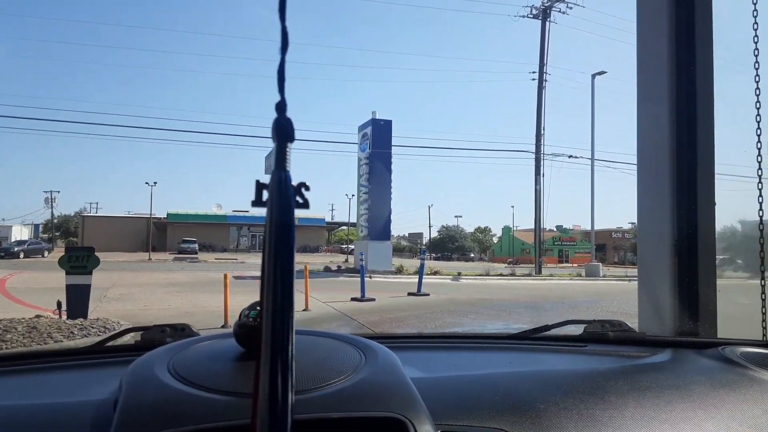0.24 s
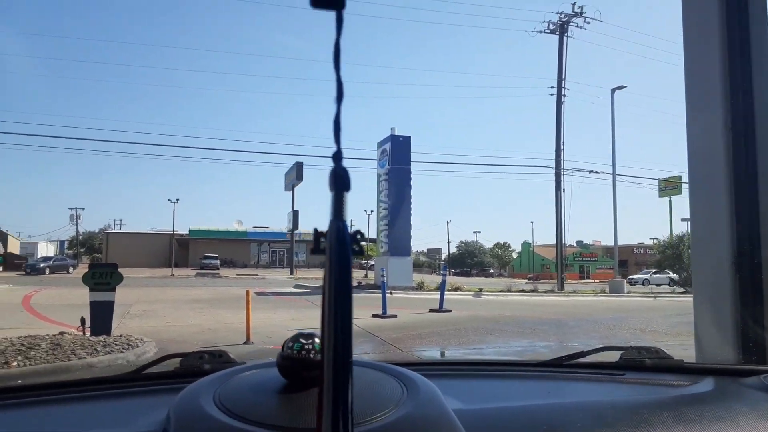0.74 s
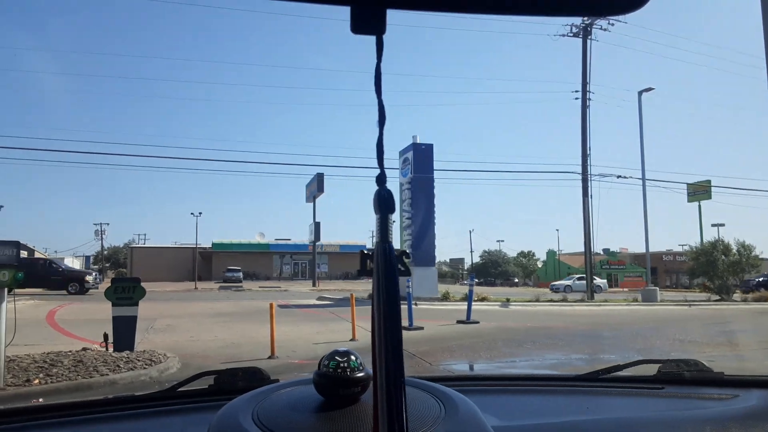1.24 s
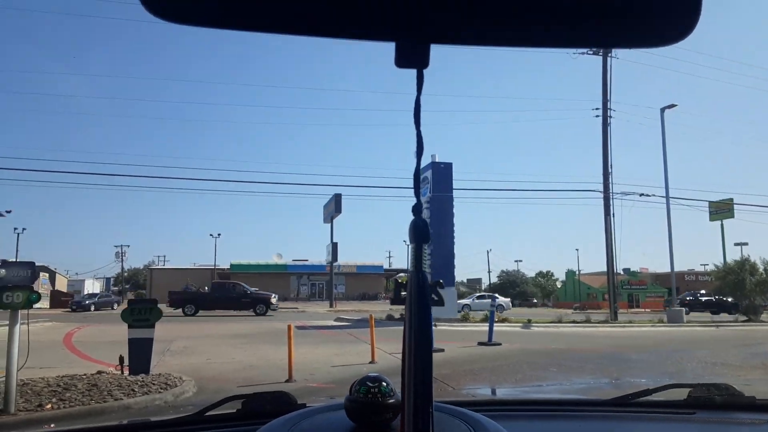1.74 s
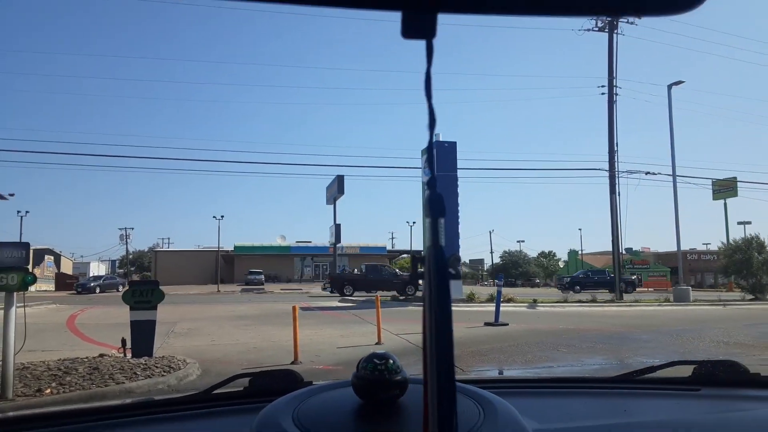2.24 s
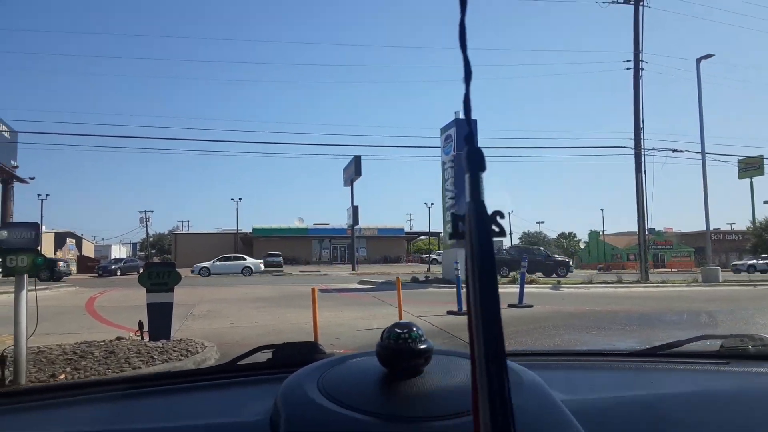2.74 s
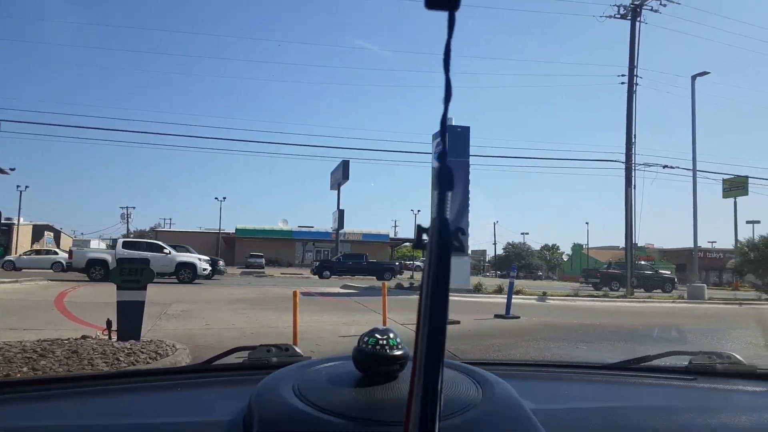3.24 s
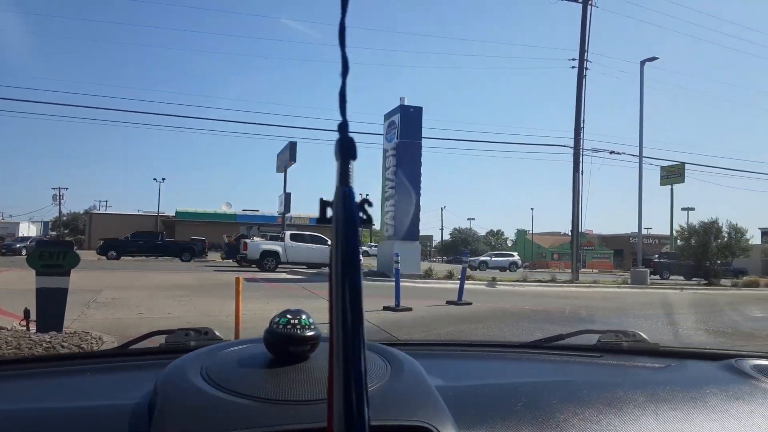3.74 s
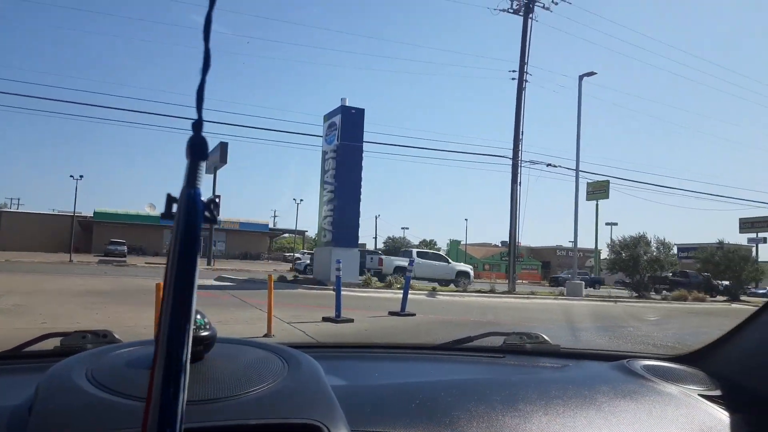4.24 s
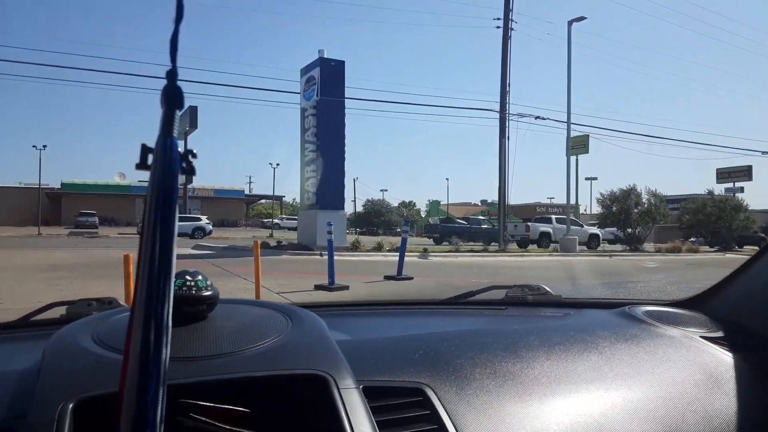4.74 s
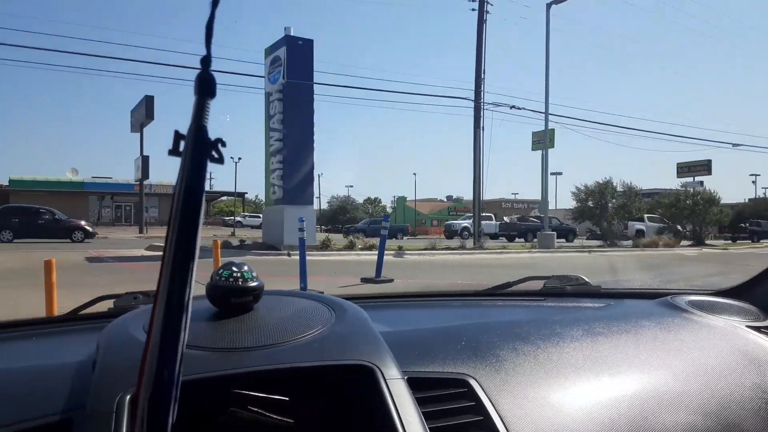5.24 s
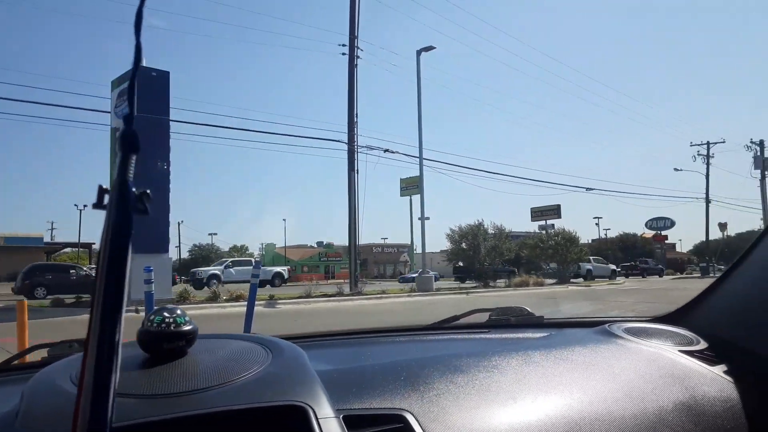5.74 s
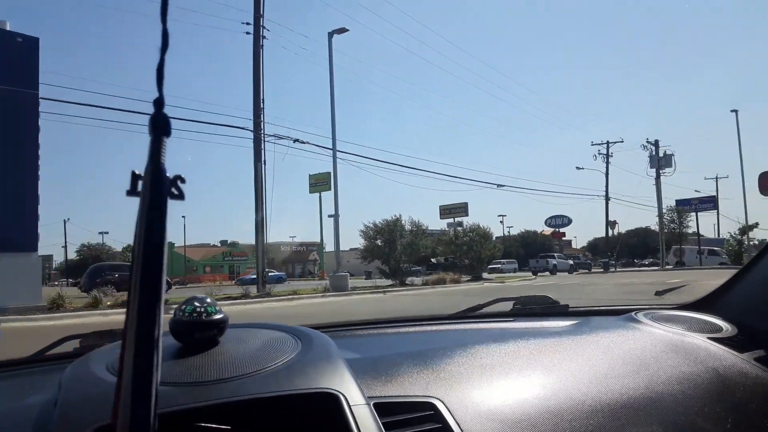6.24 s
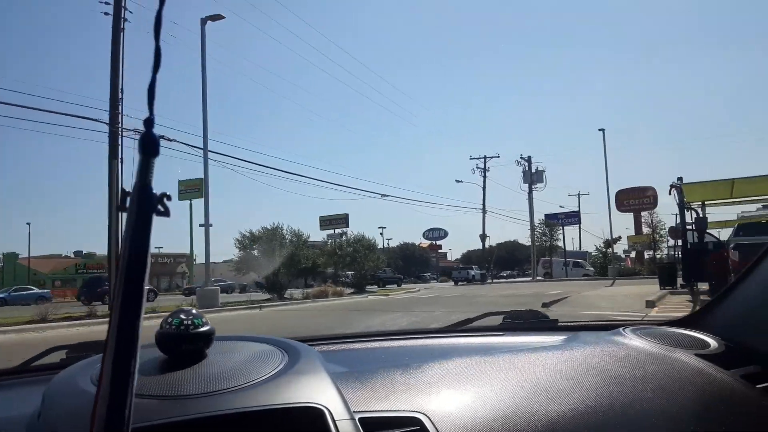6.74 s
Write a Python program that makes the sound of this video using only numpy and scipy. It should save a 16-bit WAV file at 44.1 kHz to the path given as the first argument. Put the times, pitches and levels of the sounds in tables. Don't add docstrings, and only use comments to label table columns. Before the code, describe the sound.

A phone inside a moving car picks up dense low blower rumble and boomy body vibration, steady for over two seconds. It then sinks quickly as the car rolls clear, uncovering a wavering fan hum, another fan coasting down in pitch, soft airy hiss and a low engine idle. Faint cloth rustle accompanies the turn; one sharper trim snap comes near the end, amid quiet rolling rumble.

```python
import sys
import numpy as np
from scipy import signal
from scipy.fft import rfft, irfft, next_fast_len
from scipy.io import wavfile
from scipy.ndimage import uniform_filter1d

SR = 44100
rng = np.random.default_rng(int(sys.argv[2]) if len(sys.argv) > 2 else 0)


def unload_wav(signal):
    wavfile.write(
        sys.argv[1],
        SR,
        np.round(np.clip(np.atleast_2d(signal).T, -1, 1) * 32767).astype(np.int16),
    )


def boost_factor(decibels):
    exponent = np.asarray(decibels, float) / 20
    return 10 ** exponent


N = 307808
T = np.arange(N) / SR
SIZE = next_fast_len(N)
HZ = np.maximum(np.arange(SIZE // 2 + 1) * SR / SIZE, 1)

# start_s, jets_db (push on the body), tunnel_db (roar from the tunnel mouth)
LEAVING = [(0, -2, 0.5), (.4, -1.5, -1.5), (.9, 0, 0.5), (1.3, -1, -1), (1.7, -1, -1), (2.0, -1, -2.5),
           (2.4, -3.5, -3.5), (2.8, -7, -2.5), (3.05, -6.5, -2.5), (3.4, -20.5, -2.5), (3.9, -21, -2),
           (4.4, -29, -1.5), (5.0, -30.5, -2.5), (5.4, -27.5, -6.5), (5.65, -32, -6.5), (6.3, -29, -8.5),
           (6.98, -32.5, -9)]
LEAVE_S = (2.4, 3.6)
PULL_AWAY_S = (5.2, 4.8)


def curves(table):
    s, *columns = np.transpose(table)
    return np.array([np.interp(T, s, column) for column in columns])


def noise(gain, count=2):
    spectrum = rfft(rng.standard_normal((count, SIZE))) * gain
    x = irfft(spectrum, SIZE)[:, :N]
    return x / np.sqrt(np.mean(x ** 2))


def resonance(hz, width):
    return 1 / (1 + ((HZ - hz ** 2 / HZ) / (1.22 * width)) ** 2)


def colour(points):
    hz, db = np.transpose(points)
    return boost_factor(np.interp(np.log(HZ), np.log(hz), db, left=-90, right=-90))


def walk(rate):
    k = int(SR / rate)
    steps = np.repeat(rng.standard_normal(N // k + 1), k)
    return 1.24 * uniform_filter1d(uniform_filter1d(steps, k), k)[:N]


def bump(s, length):
    return np.exp(-(2 * (T - s) / length) ** 2)


def ports_db(pan_db):
    return np.array([[pan_db], [-pan_db]]) / 2


def path_db(shares_db, grows_db_s=0):
    jets_db, tunnel_db = curves(LEAVING)
    jets_share_db, tunnel_share_db, rolling_share_db = shares_db
    jets = boost_factor(jets_db + jets_share_db + grows_db_s * np.minimum(T - LEAVE_S[0], 0))
    tunnel = boost_factor(tunnel_db + tunnel_share_db)
    rolling = boost_factor(rolling_share_db + np.interp(T, PULL_AWAY_S, (-3, 0)))
    return 10 * np.log10(jets ** 2 + tunnel ** 2 + rolling ** 2)


def cabin(modes, level_db, flutter_db):
    out = 0
    away = np.clip((T - LEAVE_S[0]) / (LEAVE_S[1] - LEAVE_S[0]), 0, 1)
    for hz, width, near_db, far_db, pan_db, like in modes:
        mid, side = noise(resonance(hz, width))
        shared = np.sqrt((1 + like) / 2) * mid
        opposed = np.sqrt((1 - like) / 2) * side * np.array([[1], [-1]])
        db = level_db + near_db + (far_db - near_db) * away + flutter_db * walk(5.92)
        out = out + (shared + opposed) * boost_factor(db + ports_db(pan_db))
    return out


def jets_on_body():
    # pitch_hz, width_hz, near_db (under the jets), far_db (in the open),
    # pan_db (left minus right), like (coherence of the ports, -1 to 1)
    buffet_modes = [(55, 24, -2.5, -1.5, 3, 1), (81, 19, -5, -7.5, 2.5, .93), (37, 10, -15, -22, 3, 0.94)]
    boom_modes = [(104.1, 11, -6.5, -6, 0, 1), (119.3, 24.3, -2.5, -1, 4, 0.97), (135, 15, -13, -6, 4, 0.9),
                  (154.8, 38, -7, -15.5, 4, 0.99)]
    panel_modes = [(224, 40, -9, -13, 2.8, .85), (270, 49.4, -4.5, -5.5, 1.2, 0.94),
                   (321.7, 62.3, -0.5, -2, 0.75, 0.86), (385, 23, -11, -18, 1.1, 0.48),
                   (434.4, 28, -18, -17.5, .6, 0.63)]
    glass_modes = [(512, 86.5, 0.5, -0.5, .1, 0.59), (687, 143, -8.5, -9, 0.85, 0.62),
                   (808, 110, -11, -13, 0.89, 0.1), (947, 360, -15, -15, 2.1, 0.15)]
    buffet = cabin(buffet_modes, path_db((-22.5, -51.5, -38), grows_db_s=1.5), flutter_db=1.5)
    boom = cabin(boom_modes, path_db((-16.5, -33, -34.5)), flutter_db=1.18)
    panels = cabin(panel_modes, path_db((-22.5, -26.5, -41.5), grows_db_s=0.5), flutter_db=1.18)
    glass = cabin(glass_modes, path_db((-41.5, -34.5, -42)), flutter_db=1.18)
    return buffet + boom + panels + glass


def blades(hz, swells, base_db, second_db, lag):
    fade = 1.2
    gain = boost_factor(base_db + fade * curves(LEAVING)[1]) * np.ones((2, 1))
    for s, length, peak_db, pan_db in swells:
        gain = np.hypot(gain, bump(s, length) * boost_factor(peak_db + ports_db(pan_db)))
    phase = 2 * np.pi * np.cumsum(hz + 0.29 * walk(3.2)) / SR - np.array([[lag], [0]])
    gain = gain * boost_factor(1.8 * walk(14))
    octave = boost_factor(second_db) * np.sin(2 * phase + np.array([[0], [2.4]]))
    return np.sqrt(2) * gain * (np.sin(phase) + octave)


def blowers():
    # start_s, pitch_hz
    blade_rate = [
        (0, 475),
        (3.2, 474.8),
        (4.0, 472.6),
        (6.98, 472.6),
    ]
    # centre_s, length_s, peak_db, pan_db (left minus right)
    running_swells = [
        (.22, .3, -35, -2),
        (.86, .5, -29.5, -6),
        (1.6, .45, -35.5, 4),
        (2.68, .35, -39, -2),
        (4.25, .3, -34, 1),
        (4.88, .65, -30, -1),
        (6.57, .4, -37.5, -3),
    ]
    # centre_s, length_s, peak_db, pan_db (left minus right)
    coasting_swells = [
        (2.3, .5, -42, -5),
        (3.0, .4, -38, 0),
        (3.4, .45, -28, -3),
        (3.75, .3, -35, -6),
        (4.16, .35, -34, 0),
        (4.6, .22, -32, 2),
        (4.93, .3, -34, 1),
        (5.32, .4, -28.5, 3),
        (5.87, .55, -36, -1),
    ]
    switch_off_s, drag_s = 1.85, 7.75
    coast_hz = 474 / (1 + np.maximum(T - switch_off_s, 0) / drag_s)
    running = blades(curves(blade_rate)[0], running_swells, base_db=-38, second_db=-24.0, lag=0.12)
    coasting = blades(coast_hz, coasting_swells, base_db=-39, second_db=-27.5, lag=0.67)
    return running + coasting * np.clip((T - switch_off_s) / .3, 0, 1)


def engine():
    firing_hz, left_right_db = 45.3, np.array([[-40.5], [-47.5]])
    phase = 2 * np.pi * np.cumsum(firing_hz + .5 * walk(2.2)) / SR
    level_db = left_right_db + np.interp(T, PULL_AWAY_S, (-3.5, 0)) + 1.5 * walk(17)
    return np.sqrt(2) * np.sin(phase) * boost_factor(level_db)


def vents():
    # pitch_hz, level_db (per Hz)
    hiss_spectrum = [(530, -31), (900, -8.5), (1210, -5.5), (1310, -7.5), (1440, -5), (1810, -9),
                     (2420, -13), (2630, -14.5), (2890, -15), (3230, -14), (5060, -17), (6890, -23.5),
                     (7920, -28.5), (8380, -38.5), (10900, -69.5), (18400, -120)]
    # pitch_hz, width_hz, near_db, far_db, pan_db (left minus right), like (-1 to 1)
    duct_modes = [(1254, 82, -9.5, -11, 0.93, .1), (1400, 110, -13.5, -24, 0.76, .1),
                  (1690, 280, -30, -9, 0.81, -.2), (2830, 220, -17, -28.5, 1, .1),
                  (4500, 290, -29.5, -19, .3, .1), (6670, 350, -26.5, -26.5, .3, .1)]
    level_db = path_db((-52, -49, -52))
    treble_db = -.5 + 0.29 * curves(LEAVING)[1]
    hiss = noise(colour(hiss_spectrum))
    hiss = hiss - 0.043 * hiss[::-1]
    dull = signal.sosfilt(signal.butter(2, 3500, fs=SR, output="sos"), hiss)
    hiss = dull + (hiss - dull) * boost_factor(treble_db)
    hiss = hiss * boost_factor(level_db + 1.18 + 0.83 * walk(9) + ports_db(.8))
    return hiss + cabin(duct_modes, level_db, flutter_db=3.5)


def ticks():
    # start_s, peak_db, low_db (low part), top_db (top part), pan_db (left minus right)
    tick_events = [(0.3054, -42.5, -1, -19, -2.5), (0.9972, -43, -7, -31, -2), (1.1987, -39, -4, -35, -3),
                   (1.217, -45.5, -2, -38, 5), (1.3673, -49, 8, -30, 0.0), (1.504, -43.5, 0, -32, -2),
                   (2.918, -46.5, 2, -32, -4), (4.7336, -41.5, 0, -32, -1), (5.177, -48, 5, -28, -2.5),
                   (6.1445, -29, -2, -8, -3.5), (6.149, -35, -4, -18, 1.5)]
    # pitch_hz, width_hz, level_db
    trim_modes = [(2350, 1600, 2.5), (3580, 1400, -8), (4840, 1100, -6.5), (5820, 1300, -4.5),
                  (7080, 1300, -1.5)]
    parts = [noise(resonance(hz, width)) * boost_factor(db) for hz, width, db in trim_modes]
    low, body = parts[0], sum(parts[1:])
    top = noise(resonance(13500, 3000))
    ring, sizzle = np.zeros((2, 2, N))
    for s, peak_db, low_db, top_db, pan_db in tick_events:
        t60 = 0.023 if peak_db > -34 else 0.051
        at = slice(int(s * SR), int(s * SR) + SR // 10)
        t = T[at] - T[at][0]
        hardness = np.clip((peak_db + 44.5) / 20, .1, 1)
        crack = hardness * t / 0.00085 * np.exp(1 - t / 0.00042)
        rattle = 0.98 * np.clip(t / 0.0017, 0, 1) * boost_factor(-60 * t / t60)
        shape = (crack + rattle) * boost_factor(peak_db - 5.5 + ports_db(pan_db))
        trim = body[:, at] + boost_factor(low_db) * low[:, at]
        high = boost_factor(top_db) * top[:, at]
        ring[:, at] += (0.35 * trim.mean(axis=0) + .6 * trim) * shape
        sizzle[:, at] += (0.35 * high.mean(axis=0) + .6 * high) * shape
    return signal.sosfilt(signal.butter(6, 8400, fs=SR, output="sos"), ring) + sizzle


def cloth():
    # centre_s, length_s, peak_db
    brushes = [
        (0.104, .04, -84),
        (0.852, 0.052, -88.5),
        (2.606, 0.045, -87),
        (3.036, .15, -81.5),
        (4.806, .15, -82),
        (5.023, .2, -78.5),
        (5.451, .1, -83.5),
        (5.721, .15, -82),
    ]
    # pitch_hz, level_db (per Hz)
    rustle_spectrum = [(4000, -19), (5500, 6), (7000, 8), (8500, -2), (9800, -9), (11200, -2), (13000, 1),
                       (15700, -1), (16500, -17.5)]
    steady = boost_factor(np.interp(T, (4.1, 4.8), (-93, -80)))
    power = steady ** 2
    for s, length, db in brushes:
        power = power + (bump(s, length) * boost_factor(db)) ** 2
    mid, side = noise(colour(rustle_spectrum))
    rustle = mid + .6 * side * np.array([[1], [-1]])
    return rustle * np.sqrt(power) * boost_factor(6.5 + .8 * walk(20))


def microphone_hush():
    return noise(colour([(6000, -29.5), (8500, -4.5), (16000, -0.5)])) * boost_factor(-90.5)


def scene():
    return jets_on_body() + blowers() + engine() + vents() + ticks() + cloth() + microphone_hush()


def low_pass(x):
    return signal.sosfilt(signal.butter(12, 15720, fs=SR, output="sos"), x)


def record(dry):
    x = signal.sosfilt(signal.butter(2, 32, "high", fs=SR, output="sos"), dry)
    return low_pass(x)


dry = scene()
out = record(dry)
unload_wav(out)
```